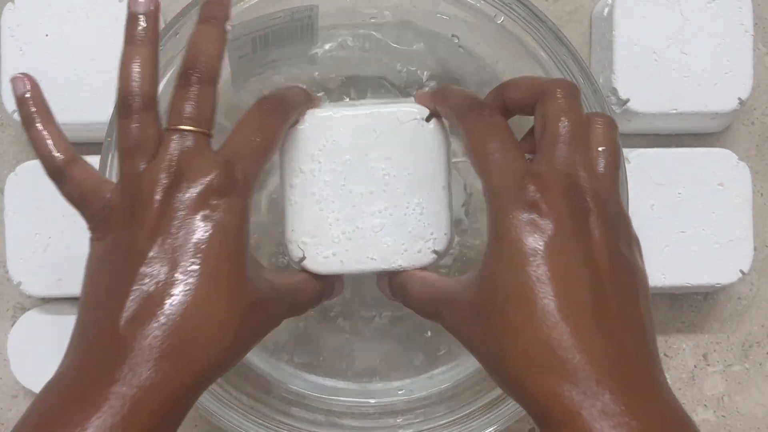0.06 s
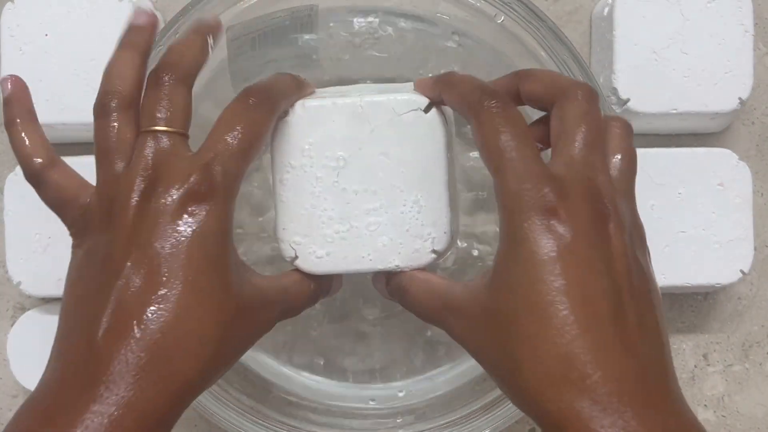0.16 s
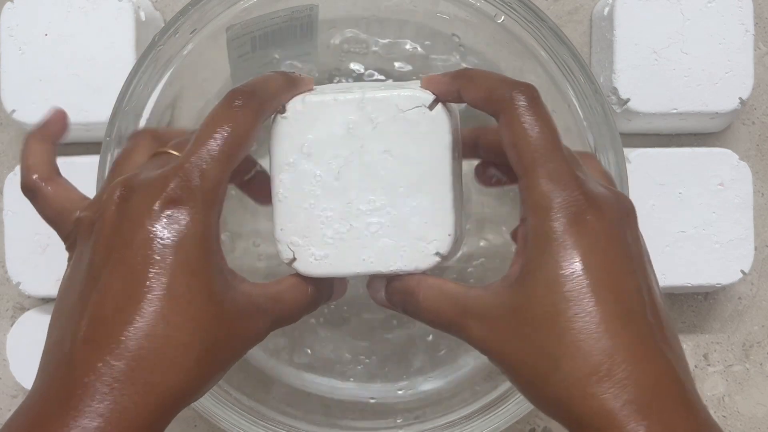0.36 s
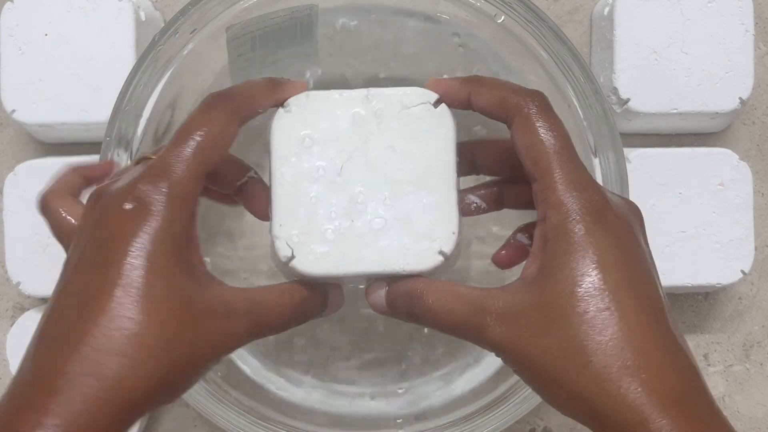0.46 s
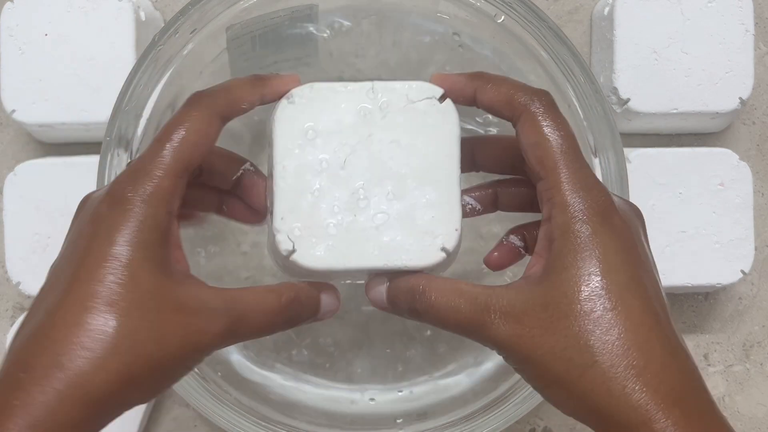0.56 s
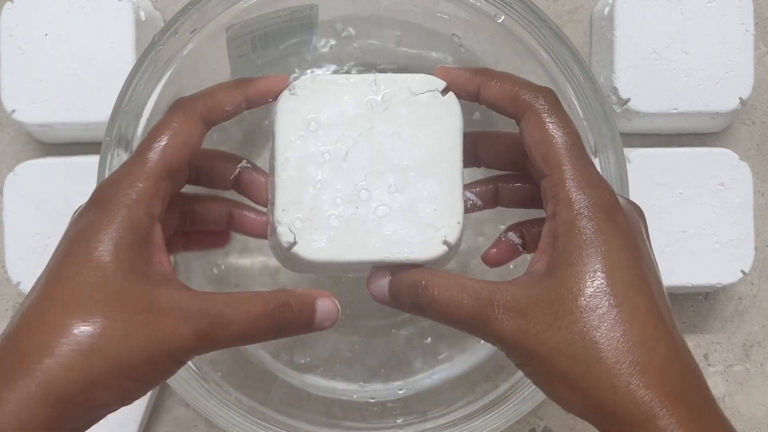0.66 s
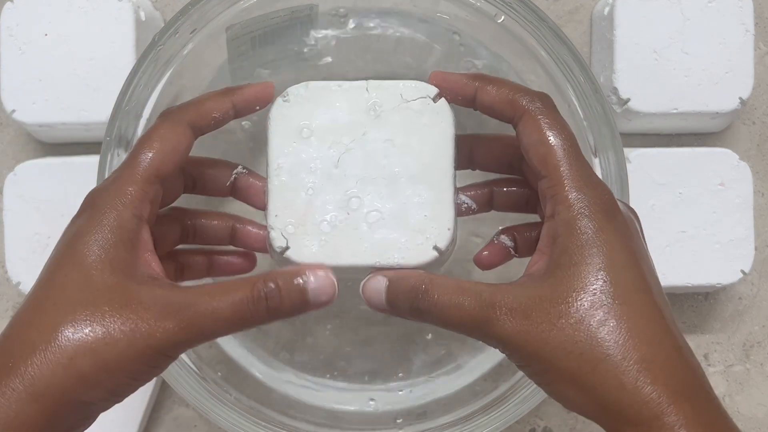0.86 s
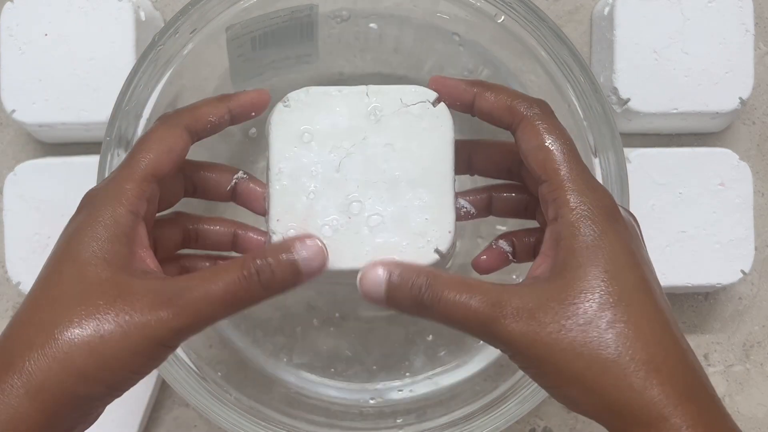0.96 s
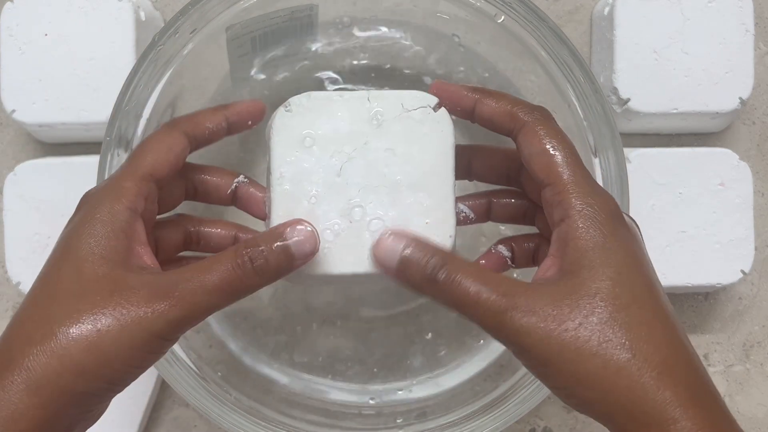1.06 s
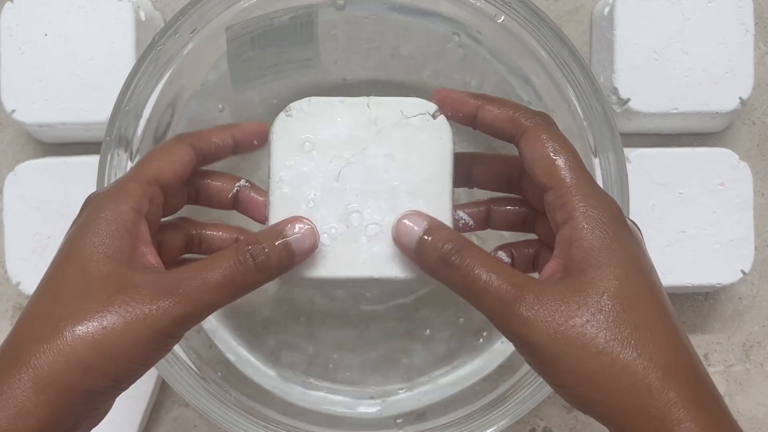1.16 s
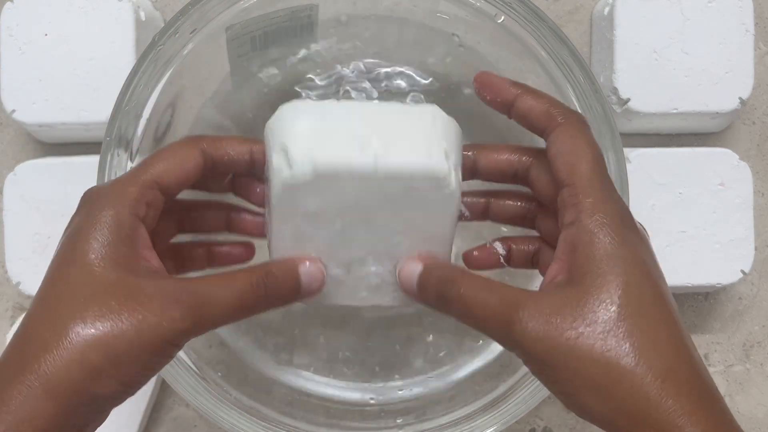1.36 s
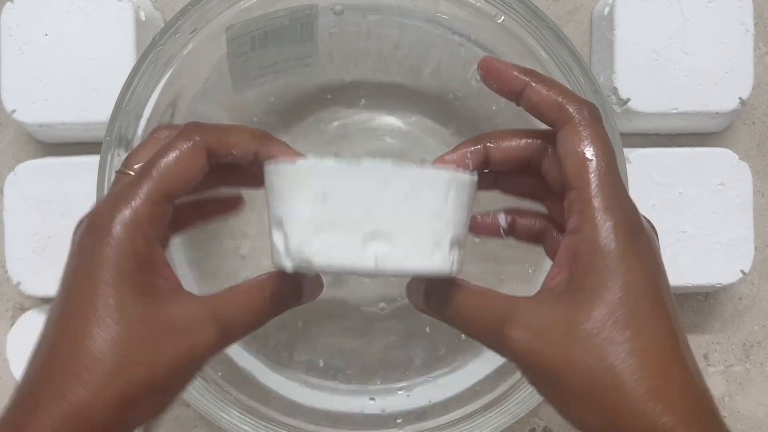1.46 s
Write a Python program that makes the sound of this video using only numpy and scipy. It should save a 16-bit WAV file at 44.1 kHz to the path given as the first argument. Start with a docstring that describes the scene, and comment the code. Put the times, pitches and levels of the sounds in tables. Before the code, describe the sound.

Close-miked dripping water in a small room: a wet chalk block comes out of a glass bowl with a low gulp, and drops patter and plop back, then dwindle. The glass rings faintly over a low background rumble.

```python
"""A few small drips, then a low gulp as wet hands lift a chalk block out of a glass bowl of water.
Drops fall back, each a tiny slap and often a ringing air bubble. The glass rings faintly along,
and tiny bubbles fizz on the wet chalk. A stereo pair of microphones stands close to the bowl
in a small room, with a low rumble and a faint hiss under it all."""
import sys
import numpy as np
from scipy import signal
from scipy.fft import rfft, irfft
from scipy.io import wavfile
from scipy.ndimage import uniform_filter1d, minimum_filter1d

SR = 44100
rng = np.random.default_rng(int(sys.argv[2]) if len(sys.argv) > 2 else 0)


def transcribe(signal):
    """Save signal, clipped to [-1, 1], as a 16-bit WAV file at the path in sys.argv[1]."""
    frames = np.atleast_2d(signal).T
    limited = np.clip(frames, -1, 1)
    pcm = np.round(limited * 32767).astype(np.int16)
    wavfile.write(sys.argv[1], SR, pcm)


N = 66150

# Air trapped by drops: (start [s], pitch [Hz], level [dB], hold [s], decay [s], glide [octaves/s])
BUBBLES = [ (.0360, 1445, -38.5, 0.0026, 0.0064, 6), (.0530, 2890, -25.5, 0.0011, 0.0027, 16),
           (0.074, 2920, -32.5, .003, 0.0027, 5.5), (0.097, 2620, -35, .003, .003, 4),
           (.1410, 2560, -27.5, 0.002, 0.0015, 4), (.0040, 6840, -26, 0.0017, 0.0024, 12),
           (0.022, 6930, -27.5, 0.0022, .001, 15.5), (0.065, 7100, -24, 0.0017, 0.00089, 0),
           (0.2189, 4150, -16.5, .001, 0.0015, 5), (.2198, 5190, -8, 0.0013, 0.0012, 7),
           (0.2202, 6030, -16, .001, .0025, 0), (0.2407, 909, 0, .004, 0.0033, -5.5),
           (.2405, 2350, 0, .002, .009, -7), (0.257, 868, -10, 0.0018, 0.0093, 1),
           (0.2643, 2375, -3.5, 0.0025, 0.0014, 12), (0.264, 1537, -14.5, 0.00088, 0.0066, 12.5),
           (0.302, 6200, -24, .002, 0.0017, 0), (0.3, 5300, -21, .002, .002, -1),
           (0.3204, 2443, -13.5, .005, 0.0019, 11), (0.3452, 2430, -9.5, 0.0016, 0.0056, 8),
           (0.3474, 1487, -22.5, .002, 0.0084, 1), (.4320, 995, -13.5, 0.0015, 0.014, 2),
           (0.431, 1530, -19, 0.0015, 0.011, 14), (0.432, 2350, -20, 0.0021, 0.0035, -3),
           (0.4637, 1020, -16.5, 0.0015, 0.0066, 6), (0.458, 2400, -28.5, 0.0047, 0.0043, 9),
           (0.4796, 1093, -15.5, 0.0026, 0.0082, 5), (.4990, 1210, -27.5, .008, 0.014, 13),
           (.5000, 2410, -19.5, 0.0031, 0.0048, 2), (0.5235, 2320, -22, 0.0022, 0.0048, -2),
           (.5315, 2260, -2, 0.0068, 0.0025, 17), (.5322, 6230, -18.5, 0.0016, 0.0044, 0),
           (0.547, 2500, -14, 0.0029, 0.0041, 4.5), (.5498, 2080, -24, 0.00091, 0.0063, -8),
           (.5500, 3000, -24.5, 0.005, 0.008, 17.5), (0.589, 3250, -25.5, .001, 0.0082, 5),
           (0.595, 1348, -4, 0.0012, 0.0038, 23.5), (0.5934, 2175, -10, .001, 0.0049, -6),
           (.6608, 3990, -4, 0.0022, 0.0016, 20), (.6606, 4920, -5.5, 0.0024, 0.0016, 20),
           (0.659, 9400, 1, 0.00089, .0015, -4), (0.654, 5400, -25, 0.00225, .001, -2),
           (0.754, 5600, -25, 0.0035, 0.0018, 21), (.5450, 8240, -7.5, 0.0007, 0.00091, 4),
           (0.6787, 2325, -4, 0.0022, 0.0055, 4), (.6778, 1573, -19.5, 0.0038, 0.014, 2),
           (0.7597, 2144, -20.5, 0.0022, 0.008, -3), (0.7872, 2317, -10, 0.0038, 0.0021, 17.5),
           (0.788, 3380, -16.5, 0.0015, 0.0019, -6), (0.899, 6730, -16, .001, 0.00089, 9),
           (.9030, 6900, -10, 0.0012, 0.00069, 4), (0.9413, 4780, -18.5, .0015, 0.0026, 1),
           (0.873, 7850, -27, 0.0011, .0012, 0), (0.884, 7900, -30, .001, .001, 0),
           (.9648, 8900, -32, .001, .001, -4), (.9650, 5600, -32, 0.0012, .0015, -2),
           (.9828, 7400, -32, .001, 0.0013, 0), (1.002, 8700, -28, .001, .0015, -2),
           (1.006, 5750, -38, 0.00091, .001, 4), (1.0714, 7300, -26, .001, 0.0028, 5),
           (1.1110, 4750, -32, .001, 0.0015, -3), (1.16, 7340, -34, .002, .002, 1),
           (1.226, 8560, -32, .001, .001, 3), (1.436, 11100, -24.5, 0.00076, .001, -5)]
# Drops hitting the water: (start [s], body [dB], snap [dB], spray [dB], decay [s], pan to left [dB])
SLAPS = [ (0.0696, -30, -20, -22, 0.00097, 8), (0.125, -50, -45, -20.5, 0.00079, 0),
         (0.1633, -33.5, -26, -22, 0.00092, -2), (.2192, -49, -9.5, -29, 0.0016, -1),
         (.2330, -21, -18, -34, 0.0028, -2.5), (.2405, 2, 5, 3, .0018, -1),
         (.2630, -20.5, -13, -13, 0.0016, 3), (0.289, -20, -13.5, -27, 0.0025, 0),
         (.3454, -18, -19, -17.5, 0.00145, 2.5), (.3680, -46, -38, -23, 0.0011, -2),
         (0.4308, -35, -25, -17.5, 0.0019, 4), (0.4618, -38, -21.5, -17.5, 0.0031, 2),
         (0.4782, -35, -13, -15.5, 0.0032, 0), (0.506, -29, -33, -22.5, .002, -1),
         (0.531, -11.5, -17, -33, 0.0011, 0.5), (.5450, -24, -14, -14.5, 0.00064, -3.5),
         (.5496, -14.5, -33.5, -26.5, 0.0033, 0), (0.567, -31, -31, -27.5, 0.0012, -4),
         (0.5844, -14.5, -20, -17, 0.0024, 4), (.5940, 1, -13, -11.5, 0.00099, -1),
         (0.6593, -13, 2, 1.5, 0.0015, 0), (0.6772, -6.5, -6, -13, 0.0015, 0),
         (.7620, -9, -5.5, -2, 0.0008, 3.5), (.7720, -24, -38, -25, 0.0043, 15),
         (0.7864, -11.5, -13.5, -13.5, 0.0011, -3.5), (0.9057, -50, -39, -18, 0.00091, 1),
         (0.9426, -33, -16, -19.5, 0.002, 1), (.9785, -55, -40, -31, 0.0012, -3),
         (1.0042, -41, -27, -28.5, 0.0026, -1), (1.1417, -58, -48, -24, .001, 1),
         (1.1702, -48, -47, -25, 0.0011, 0), (1.1914, -35, -38, -30, 0.0014, 0),
         (1.311, -57, -54, -35.5, .006, 0), (1.228, -49, -43, -28, .0012, -0.5),
         (1.437, -70, -38.5, -31.5, 0.0013, 1)]
# Body, snap and spray of a slap: (low edge [Hz], high edge [Hz])
SLAP_BANDS = [(1100, 3680), (4150, 6400), (6500, 10500)]
# Boom of bowl and table: (pitch [Hz], level [dB], t60 [s])
GULP_MODES = [(128.5, -17.5, 0.66), (194.1, -23.5, 0.39), (249, -23.5, 0.17), (317.6, -18.5, 0.14),
              (423, -23.5, 0.27), (501.4, -25, 0.35), (578, -26, 0.28), (667, -28, 0.22), (845, -20, 0.14),
              (963.8, -17, 0.36)]
# Ring of the water-filled glass: (pitch [Hz], gain [dB], t60 [s])
GLASS_MODES = [(1474, -16, .15), (1561, 7.5, 0.49), (2050, -18, .25), (2450, -20, .3), (3240, -2, 0.4),
               (3980, 8, 0.11), (5200, -25, .1), (6000, -11, 0.058), (9100, 11, .2), (9200, -13, 0.194)]
# Course of the fizz on the chalk: (time [s], gain [dB])
FIZZ_ENVELOPE = [(0, -38), (.2, -39), (.27, -35), (.4, -41.5), (.55, -33.5), (.8, -49.5), (1.0, -49.5),
                 (1.2, -48), (1.35, -57.5), (1.5, -66)]
# Colour of the trickle under the fizz: (frequency [Hz], relative level [dB])
TRICKLE_SPECTRUM = [(900, -26), (1800, 3), (2700, -7.5), (4000, 1), (5500, -8), (8000, 5.5), (11000, -3.5),
                    (15000, -11)]
# Direct sound, left microphone against right: (frequency [Hz], phase lead [rad])
LEFT_LEAD = [(700, 0), (1100, .45), (1900, 0), (4500, 0), (5250, -1), (6000, .3), (7800, -.1),
             (10900, -1.4), (14000, -2.6)]
# Direct sound, left microphone against right: (frequency [Hz], level difference [dB])
LEFT_TILT = [(60, -5.5), (200, 0.5), (400, -7), (750, -7.5), (1300, -3.5), (2400, -0.5), (15000, 0)]
# Likeness of diffuse sound at the two microphones: (frequency [Hz], coherence [0-1])
COHERENCE = [(30, 1), (150, 0.99), (400, 0.77), (1000, 0.29), (3000, 0.9), (12000, 0.083)]
# Decay of the small room: (frequency [Hz], t60 [s])
ROOM_T60 = [(200, 0.66), (600, 0.71), (1500, 0.47), (3000, 0.41), (5000, 0.25), (9000, 0.58), (15000, 0.14)]
# Colour of the room's tail: (frequency [Hz], gain [dB])
ROOM_GAIN = [(200, -0.5), (550, 0), (900, -11.5), (1800, -7), (2400, -19.5), (3600, -8), (5200, -16.5),
             (7000, -15), (9400, -17), (15000, -27)]
# Low room tone: (frequency [Hz], relative level [dB])
RUMBLE_SPECTRUM = [(15, -53), (25, -19), (33, -20), (42, -0.5), (55, -1.5), (97, -7.5), (133, -1.5),
                   (170, -4.5), (240, -8), (400, -15.5), (500, -20), (650, -29), (900, -44), (2000, -84)]
# Faint steady hiss: (frequency [Hz], relative level [dB])
HISS_SPECTRUM = [(400, -13), (800, 0.5), (1500, -5), (3000, -12), (7000, -10.5), (11000, -8),
                 (16000, -14.5)]


def bubbles():
    """Air trapped under a drop swells into a tone, glides in pitch and dies away."""
    out, t = np.zeros(N), np.arange(4400) / SR
    swell = np.sin(np.pi / 2 * np.minimum(t / 0.0012, 1))
    for start, hz, db, hold, decay, glide in BUBBLES:
        envelope = swell * np.exp(-np.maximum(t - hold, 0) / decay)
        phase = 2 * np.pi * np.cumsum(hz * 2 ** (glide * t)) / SR
        add(out, start, amp(db) * envelope * np.sin(phase))
    return out


def slaps(width=0.22, rise_s=0.00025):
    """A drop hits the water: a brief noise burst in five bands, slightly unlike at each microphone."""
    out, t = np.zeros((2, N)), np.arange(1600) / SR
    bands = [(250, 870), *SLAP_BANDS, (10500, 13000)]  # Hz; adds a thud below and a crisp edge above
    for start, body_db, snap_db, spray_db, decay, pan_db in SLAPS:
        levels = body_db - 20, body_db, snap_db, spray_db, spray_db - 7
        decays = [3.9 * decay] + 4 * [decay]  # the thud lingers
        for band, db, fade in zip(bands, levels, decays):
            envelope = np.minimum(t / rise_s, 1) * np.exp(-np.maximum(t - rise_s, 0) / fade)
            mid, side = rng.standard_normal((2, len(t)))
            noise = np.array([mid + width * side, mid - width * side])
            bandpass = signal.butter(4, band, "band", fs=SR, output="sos")
            burst = signal.sosfilt(bandpass, envelope * noise)
            burst *= np.linalg.norm(envelope) / np.linalg.norm(burst)
            add(out, start, burst * amp([[db + pan_db / 2], [db - pan_db / 2]]))
    return out


def gulp(start_s=0.2415, rise_s=0.005):
    """The block breaks free of the water and sets the low modes of bowl and table booming."""
    out, t = np.zeros(N), np.arange(SR) / SR
    for hz, db, t60 in GULP_MODES:
        envelope = np.minimum(t / rise_s, 1) * amp(db - 60 * t / t60)
        add(out, start_s, envelope * np.sin(2 * np.pi * (hz * t + rng.random())))
    return out


def glass(water, blur=0.01):
    """The bowl rings with the drops; moving water smears each mode into six close partials."""
    t = np.arange(SR // 2) / SR
    ring = np.zeros(len(t))
    for hz, db, t60 in GLASS_MODES:
        offsets, phases = rng.uniform(-0.87, 1, size=(2, 6, 1))
        cluster = np.sin(2 * np.pi * (hz * (1 + blur * offsets) * t + phases)).sum(0)
        fade = amp(-60 * t / t60)
        ring += amp(db) * np.sqrt(2) * fade / fade.sum() * unit_rms(cluster)
    return signal.fftconvolve(water, ring[None], axes=1)[:, :N]


def fizz(pops_per_s=550, spread_db=3.5, cycles_to_peak=1.8):
    """Tiny bubbles burst at random on the wet chalk and fingers, over a smooth trickle."""
    pops, t = np.zeros((2, N)), np.arange(400) / SR
    pitches_hz = np.geomspace(4490, 11360, num=24)
    for hz in pitches_hz:
        sizes = amp(spread_db * np.minimum(rng.exponential(1, N), 4))
        impulses = sizes * (rng.random(N) < pops_per_s / len(pitches_hz) / SR)
        age = t * hz / cycles_to_peak
        stereo_phase = rng.normal(0, 0.71) * np.array([[0.5], [-0.5]])
        pop = age * np.exp(-age) * np.sin(2 * np.pi * hz * t + stereo_phase)
        pops += signal.oaconvolve(impulses[None], pop)[:, :N]
    trickle = steady_noise(TRICKLE_SPECTRUM, db=-1.5)
    envelope = amp(np.interp(np.arange(N) / SR, *np.transpose(FIZZ_ENVELOPE)))
    return (amp(-5) * unit_rms(pops) + trickle) * envelope


def close_pair(source):
    """Direct sound from the bowl reaches the two close microphones with different phase and level."""
    hz = np.fft.rfftfreq(2 * N, 1 / SR)
    tilt = amp(curve_at(LEFT_TILT, hz) / 2)
    left = tilt * np.exp(1j * curve_at(LEFT_LEAD, hz))
    return irfft(rfft(source, 2 * N) * np.array([left, 1 / tilt]))[:, :N]


def room(source, early_db=-12.5, early_decay_s=0.011):
    """Quick reflections off bowl and hands, then the short tail of the small room."""
    t = np.arange(SR // 2) / SR
    hz, age, spectra = signal.stft(diffuse(rng.standard_normal((2, len(t)))), SR, nperseg=256)
    t60 = curve_at(ROOM_T60, hz)[:, None]
    unit_energy = np.sqrt(2 * np.log(1000) / t60 / SR)
    spectra *= amp(curve_at(ROOM_GAIN, hz)[:, None] - 60 * age / t60) * unit_energy
    tail = signal.istft(spectra, SR, nperseg=256)[1][:, :len(t)] * np.minimum(t / 0.005, 1)
    early = diffuse(rng.standard_normal((2, len(t)))) * np.exp(-t / early_decay_s) * (t > 0.001)
    early *= amp(early_db) / np.linalg.norm(early[0])
    return signal.fftconvolve(source[None], tail + early, axes=1)[:, :N]


def steady_noise(spectrum, db):
    """Even, coloured noise arriving from all around the microphones."""
    colour = amp(curve_at(spectrum, np.fft.rfftfreq(N, 1 / SR)))
    noise = irfft(rfft(rng.standard_normal((2, N))) * colour, N)
    return amp(db) * unit_rms(diffuse(noise))


def diffuse(noises):
    """Blends two unrelated noises into a diffuse field at two closely spaced microphones."""
    spectra, hz = rfft(noises), np.fft.rfftfreq(noises.shape[1], 1 / SR)
    coherence = curve_at(COHERENCE, hz)
    mid = spectra[0] * np.sqrt((1 + coherence) / 2)
    side = spectra[1] * np.sqrt((1 - coherence) / 2)
    return irfft([mid + side, mid - side], noises.shape[1])


def amp(db):
    """Decibels to gain."""
    return 10 ** (np.asarray(db) / 20)


def unit_rms(x):
    """Scales to an rms of one."""
    return x / np.sqrt(np.mean(x ** 2) + 1e-20)


def curve_at(points, hz):
    """Interpolates a table on a log-frequency axis."""
    freqs, values = np.transpose(points)
    return np.interp(np.log(hz + 1), np.log(freqs + 1), values)


def add(mix, start_s, sound):
    """Mixes a sound in from its start time."""
    part = mix[..., round(start_s * SR):][..., :sound.shape[-1]]
    part += sound[..., :part.shape[-1]]


def scene():
    """Bowl and chalk up close, the room and its steady tone behind."""
    water = bubbles() + slaps()
    bowl = water + glass(water) + gulp()
    chalk = fizz()
    reflections = room((bowl + chalk).mean(0))
    rumble = steady_noise(RUMBLE_SPECTRUM, db=-28.5)
    hiss = steady_noise(HISS_SPECTRUM, db=-49.5)
    return close_pair(bowl) + chalk + reflections + rumble + hiss


def record(dry):
    """A fast limiter and a hard clip flatten the loudest drops; a low-pass follows."""
    ceiling, window_s, cutoff_hz = 1.57, 0.00078, 16200
    width = round(window_s * SR)
    gain = np.minimum(ceiling / (abs(dry).max(0) + 1e-9), 1)
    smooth_gain = uniform_filter1d(minimum_filter1d(gain, width), width)
    clipped = np.clip(dry * smooth_gain, -1, 1)
    lowpass = signal.firwin(511, cutoff_hz, window=("kaiser", 9), fs=SR)
    return signal.oaconvolve(clipped, lowpass[None], "same")


dry = scene()
out = record(dry)
transcribe(out)
```